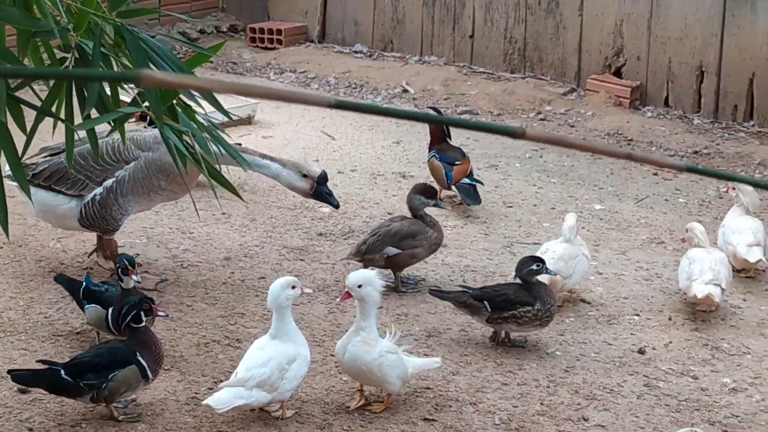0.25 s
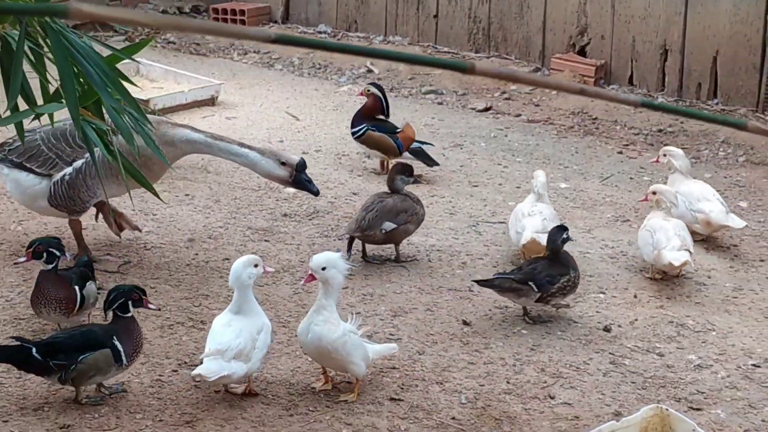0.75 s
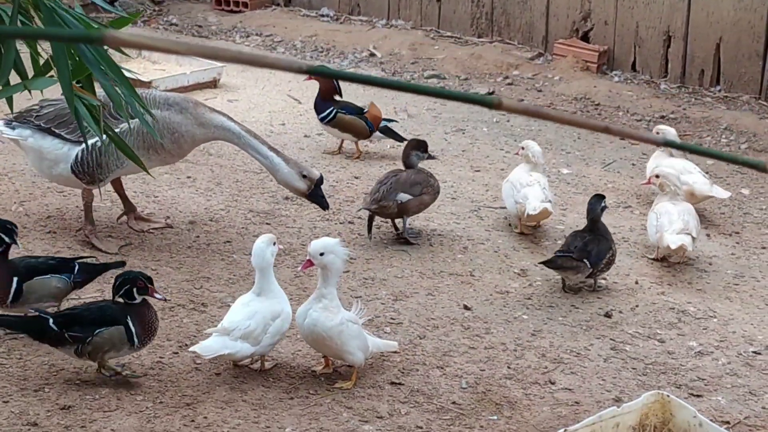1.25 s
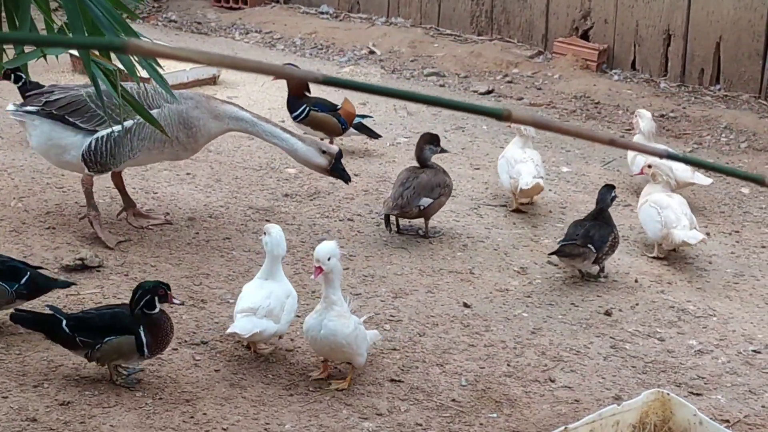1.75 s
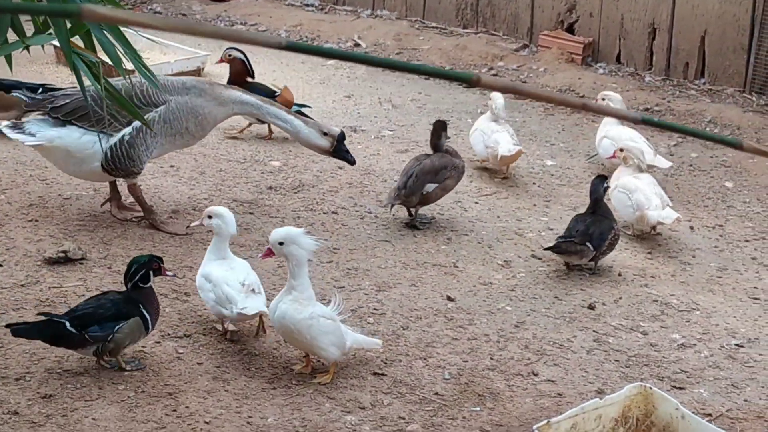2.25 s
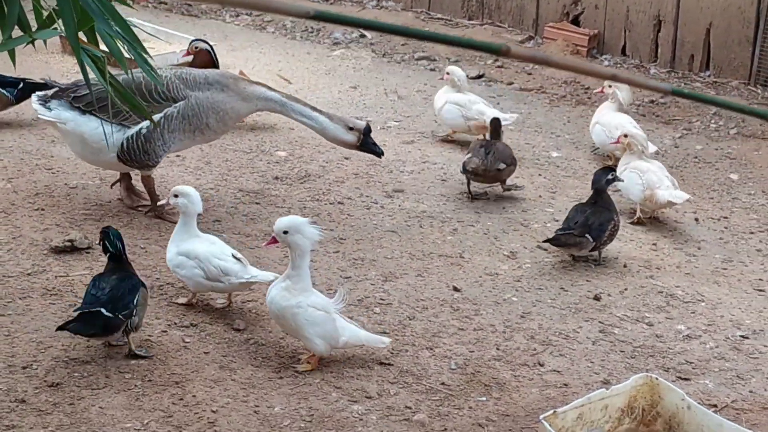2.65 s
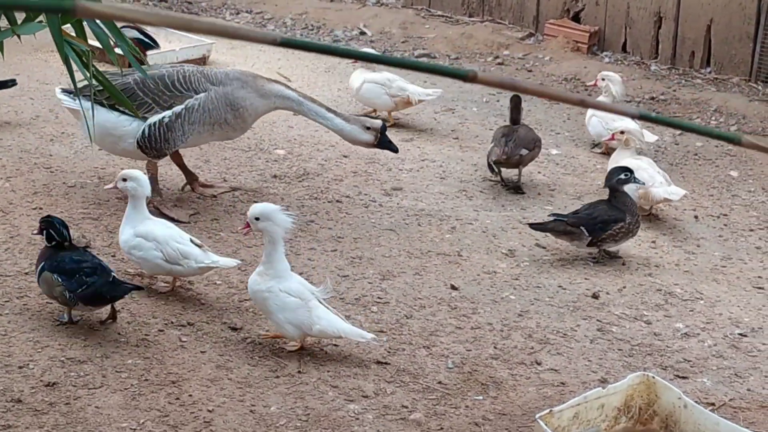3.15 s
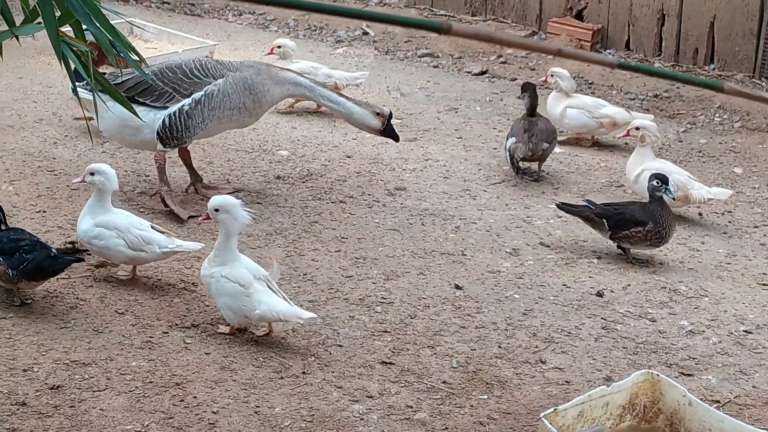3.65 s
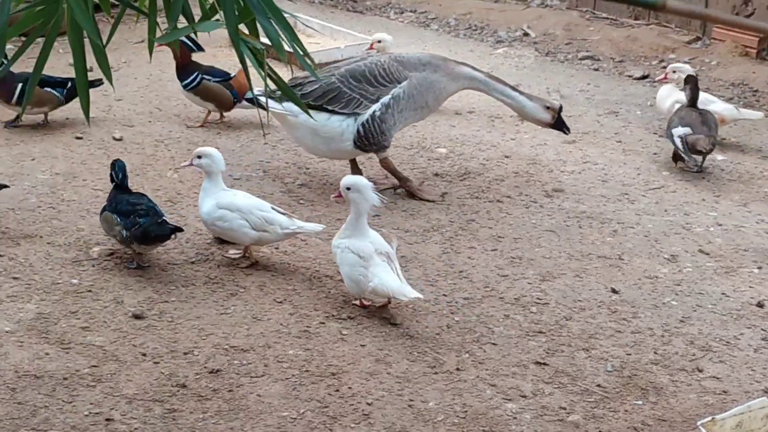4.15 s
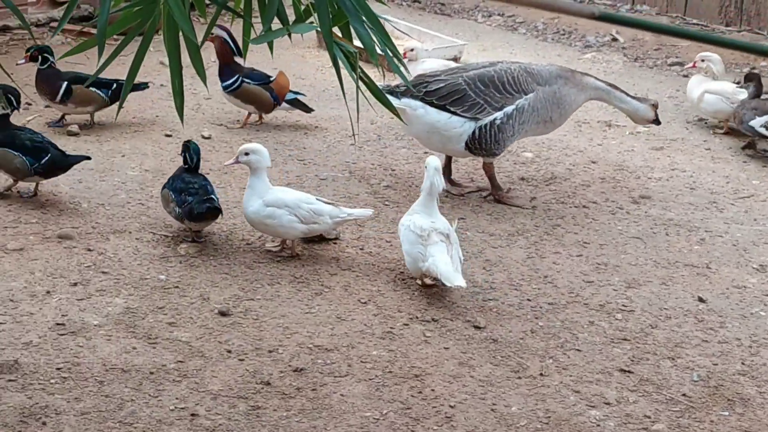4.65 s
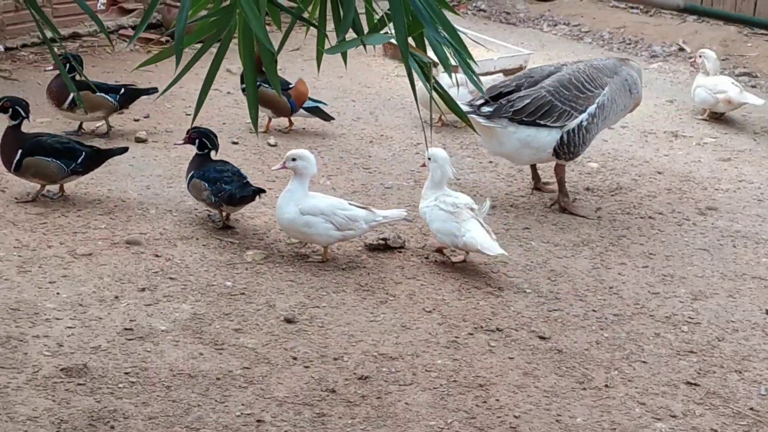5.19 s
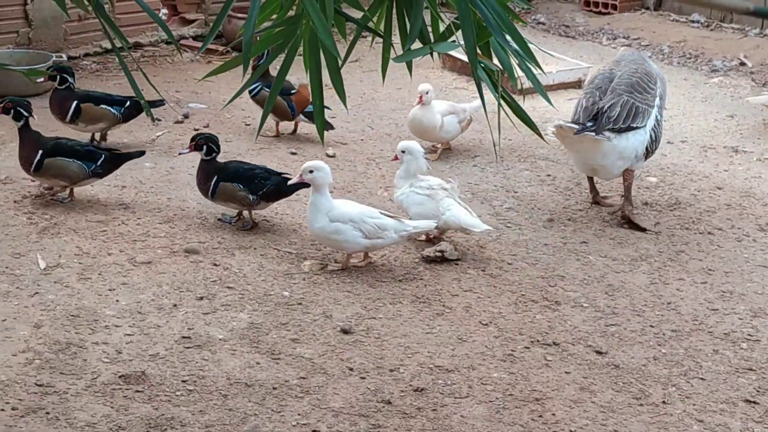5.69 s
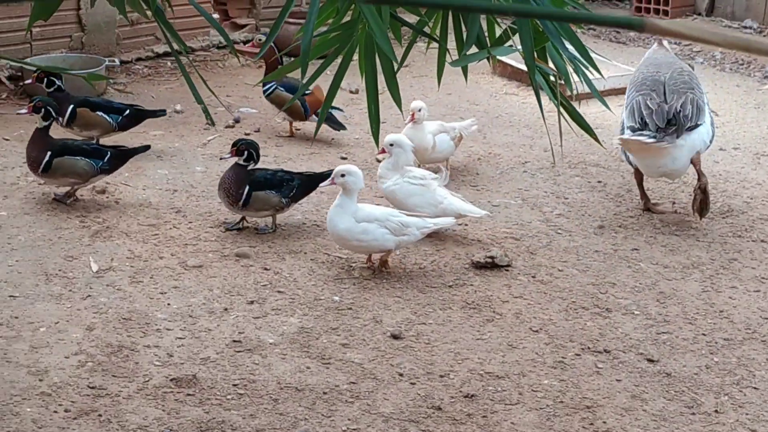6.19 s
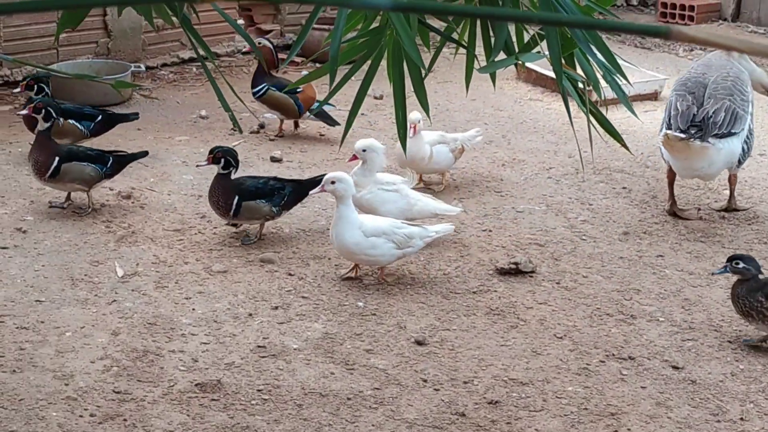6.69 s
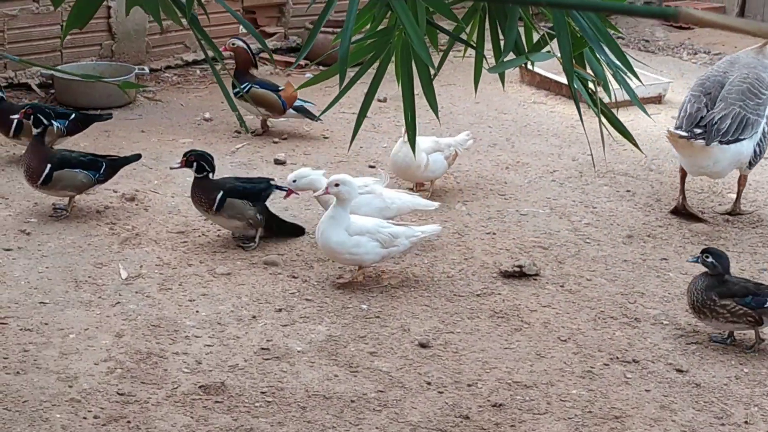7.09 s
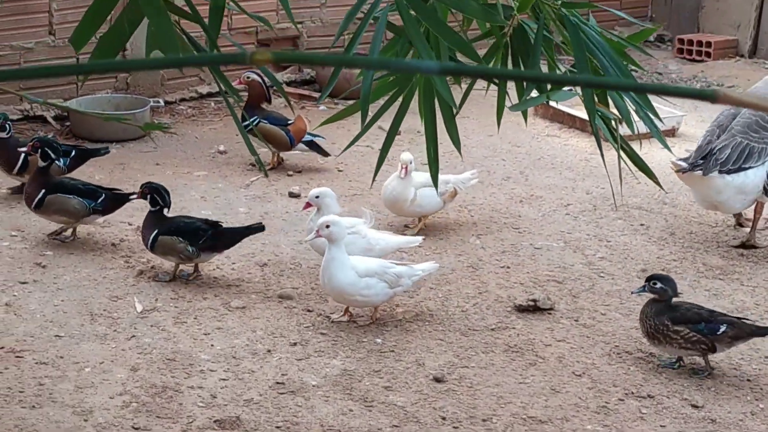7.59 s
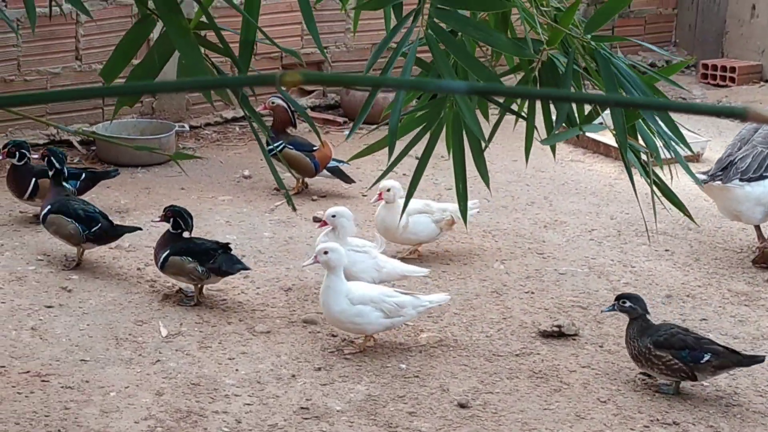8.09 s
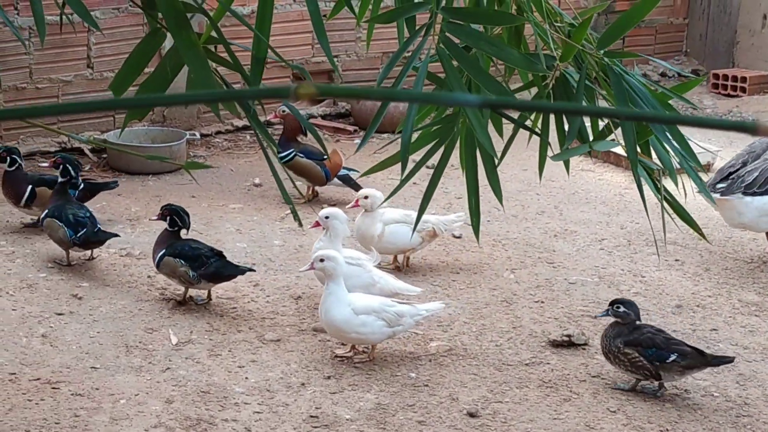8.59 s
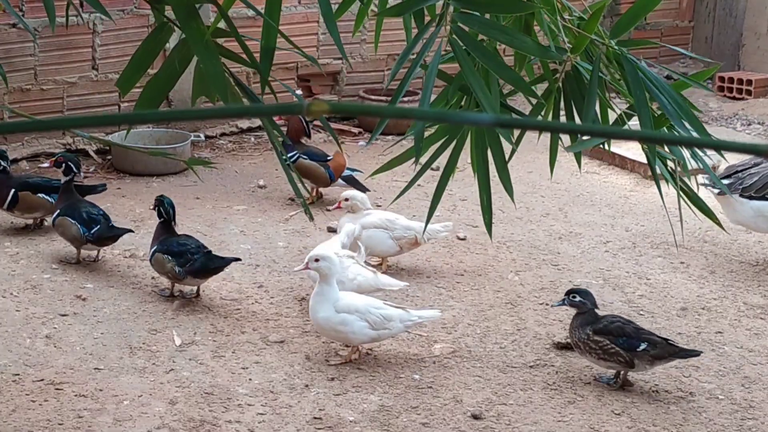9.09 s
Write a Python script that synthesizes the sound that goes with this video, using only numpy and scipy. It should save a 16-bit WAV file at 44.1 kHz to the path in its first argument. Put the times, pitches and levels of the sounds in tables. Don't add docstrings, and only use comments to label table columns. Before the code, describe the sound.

A goose gives loud, hoarse, brassy honks about every second and a half, while ducks faintly whistle, squeak and purr in a walled dirt yard.

```python
import sys
import numpy as np
from scipy import signal
from scipy.fft import rfft, irfft, next_fast_len
from scipy.io import wavfile
from scipy.ndimage import uniform_filter1d, minimum_filter1d, map_coordinates

SR = 44100
rng = np.random.default_rng(int(sys.argv[2]) if len(sys.argv) > 2 else 0)


def undo_db(level):
    steps = np.asarray(level, float) / 20
    return 10 ** steps


def materialize(psi):
    bounded = np.clip(np.atleast_2d(psi).T, -1, 1)
    quanta = np.round(bounded * 32767).astype(np.int16)
    wavfile.write(sys.argv[1], SR, quanta)


N = 411894

# Hz, width in Hz, level in dB.
CHEST_MODES = [(165, 60, 17), (346, 60, -16), (566, 190, 13)]
WINDPIPE_MODES = [(483, 7.7, -16), (881, 84, 14.5), (1126, 44, 13)]
MOUTH_MODES = [(1279.6, 46.6, 8), (1680, 71, 4.5)]
BEAK_MODES = [(1947, 250, 0), (2218, 180, 6), (2407, 102, 5.5), (2679, 90, 3), (2915, 130, 0.5)]
# Hz, level in dB per Hz.
RASP_SPECTRUM = [(1760, -24.5), (3000, -12), (3170, -6), (3840, -5), (4890, -10), (9130, -13),
                 (11600, -32.5), (13500, -33), (14100, -63.5), (15500, -103)]
# time in seconds, lag of the left port in ms, left over right in dB.
BEARING = [(.5, 0.55, 11), (2, 0.56, 9), (3.5, 0.69, 7), (5.2, 0.53, 8), (6.8, 0.36, 6), (8.8, 0.16, 7)]


def goose():
    low_pitch, pitch, rough, lift_db, drop_db = melody()
    drone, _ = syrinx(low_pitch, rough, waver=.008, jitter=.04, scatter_db=4, breath=.5)
    source, puffs = syrinx(pitch, rough, waver=.011, jitter=.045, scatter_db=5, breath=.6)
    ring_alike, ring_lagging, locked = rings()

    harsh = source + 0.75 * unit(puffs * rng.standard_normal(N))
    hiss = unit((puffs + .15) * rng.standard_normal((2, N)))
    rasp = unit(filtered(hiss, lambda hz: undo_db(along(RASP_SPECTRUM, hz)) * (hz > 2950)))
    steep = filtered(source + 0.57 * (harsh - source), lambda hz: 1 / (1 + (330 / (hz + 1)) ** 6))

    rest = 1 - 0.29 * locked
    horn = resonate(resonate(steep, [(987, 750, 0)]), WINDPIPE_MODES) * rest
    mouth = resonate(resonate(steep, [(1450, 2700, 0)]), MOUTH_MODES) * rest
    beak = resonate(resonate(harsh, [(2360, 3800, 0)]), BEAK_MODES) * rest
    hum = resonate(resonate(drone, [(268, 300, 0)]), CHEST_MODES)

    horn_gain, chest_gain, mouth_gain, beak_gain = breath_levels(pitch, lift_db, drop_db)
    low = horn_gain * horn
    high = undo_db(-4) * mouth_gain * mouth + undo_db(-2) * beak_gain * beak
    rasp = undo_db(-15) * beak_gain ** 0.86 * rasp
    chest = undo_db(4.85) * chest_gain * hum

    low, high, *rasp = patchy(np.array([low, high, *rasp]), 3.2, bins=4, frames=5)
    low = low + ring_alike
    high = high + ring_lagging

    lag_ms, pan_db, _ = curves(BEARING)

    def delayed(x, share):
        return map_coordinates(x, [np.arange(N) - share * lag_ms * SR / 1000], order=3)

    left = delayed(high, 1) + delayed(low, .1)
    left = (left + rasp[0]) * undo_db(pan_db / 2)
    right = (high + low + rasp[1]) * undo_db(-pan_db / 2)
    return np.array([left, right]), chest, high + low / 4 + rasp[0]


def syrinx(pitch, rough, waver, jitter, scatter_db, breath):
    rough = uniform_filter1d(np.clip(rough, 0, 1), size=400)
    shake = 1 + waver * wobble(22) + jitter * rough * wobble(120)
    turns = np.cumsum(uniform_filter1d(pitch, size=450) * shake) / SR
    at = np.flatnonzero(np.diff(np.floor(turns)))
    late = (np.ceil(turns[at]) - turns[at]) / (turns[at + 1] - turns[at])
    size = undo_db(scatter_db * rough[at] * rng.standard_normal(N)[at])
    pulses = np.bincount(at, size * (1 - late), N) + np.bincount(at + 1, size * late, N)
    puffs = np.exp(-3.5 * (turns % 1))
    leak = np.clip(breath * rough, 0, 1)
    air_noise = unit(puffs * rng.standard_normal(N))
    return np.sqrt(1 - leak ** 2) * unit(pulses) + leak * air_noise, puffs


# start in seconds, end of the breath in seconds,
# then windpipe, chest and beak level in dB (the beak's between swells).
HONKS = [
    (0.235, 0.857, -33, -42.5, -41),
    (1.544, 2.275, -25, -43, -40.5),
    (3.097, 3.86, -27, -41.5, -39),
    (4.794, 5.55, -26, -40, -39.5),
    (6.263, 7.32, -32, -40, -42.5),
    (8.344, 8.93, -27, -45.5, -38),
    (9.019, 9.251, -28, -43, -37),
]
# time in seconds, pitch in Hz.
LOW_NOTES = [
    [(.3, 162.9), (.5, 167.4), (.75, 175.6)],
    [(1.6, 161.7), (1.7, 165), (1.8, 160.8), (2.03, 177.1), (2.13, 180.3)],
    [(3.21, 166.4), (3.3, 156.7), (3.5, 168.4), (3.65, 165)],
    [(4.85, 157.3), (5.02, 155.4), (5.09, 169.4), (5.26, 173.4), (5.47, 179.8)],
    [(6.32, 157.4), (6.41, 182.6), (6.49, 156.2), (6.58, 185.4), (6.79, 176.6), (6.86, 169), (6.92, 180),
     (7.26, 175.5)],
    [(8.48, 149.8), (8.56, 143.9), (8.64, 150.7), (8.84, 167.9)],
    [(9.16, 174.7)],
]
# start in seconds, length in seconds, pitch in Hz,
# windpipe dB over the honk, chest dB over the low note.
JUMPS = [(.35, 0.058, 183.8, 0.5, -7.5), (0.515, 0.2, 273, -2.5, -28.5), (1.824, .205, 220.6, 2, -9.5),
         (2.139, 0.058, 220.6, 0, -21), (2.201, 0.15, 272.2, 1.5, -6.5), (3.389, 0.12, 220.2, 3.5, -15),
         (3.673, 0.16, 220.5, 4, -15.5), (4.897, .065, 259, 1, 0), (5.101, 0.079, 218.3, 4, -16.5),
         (5.177, 0.06, 266, -1.5, -20.5), (5.365, 0.097, 220.3, 1.5, -18), (6.592, .06, 222.7, 3, -25),
         (6.654, 0.059, 283.2, 5.5, -30.5), (6.714, .064, 223.7, 6.5, -15.5),
         (6.929, .229, 191.4, -4, -23.5), (7.154, 0.096, 283.4, 8, -9.5), (8.644, 0.09, 201.7, -2, -10),
         (8.731, 0.099, 253, 1.5, -22), (8.889, 0.098, 204.5, -1.5, -20), (8.998, .16, 260.9, -1, -21.5)]


def melody():
    scoop, scoop_s, sag, sag_s = .11, .03, .12, .06
    reach, reach_s, chest_lag_s = .03, .025, 0.013
    rough_low, rough_high, rough_edge = .34, .15, .3
    t = np.arange(N) / SR
    pitch = np.interp(t, *np.transpose(sum(LOW_NOTES, [])))
    rough = np.full(N, rough_low)
    for start, end, *_ in HONKS:
        head = (t > start - .05) * (t < end) * np.exp(-np.abs(t - start) / scoop_s)
        tail = ramp(t, end - sag_s, 2 * sag_s) * (t < end + .08 + sag_s)
        pitch = pitch * (1 - scoop * head - sag * tail)
        rough = rough + rough_edge * (head + tail)
    low = pitch.copy()
    lift_db, drop_db = np.zeros((2, N))
    for start, length, hz, horn_db, chest_db in JUMPS:
        on = slice(round(start * SR), round((start + length) * SR))
        pitch[on] = hz * (1 - reach * np.exp((start - t[on]) / reach_s))
        rough[on], lift_db[on], drop_db[on] = rough_high, horn_db, chest_db
    drop_db = np.interp(t - chest_lag_s, t, uniform_filter1d(drop_db, size=2400)) + 2.5 * wobble(12)
    return low, pitch, rough, uniform_filter1d(lift_db, size=1500), drop_db


# peak in seconds, beak dB, mouth dB, length in seconds.
SWELLS = [(0.388, -25, -14.5, 0.21), (0.641, -12.5, -8, 0.15), (.78, -33.5, -32, 0.35),
          (1.69, -25.5, -24.5, 0.12), (1.956, -19.5, -24, 0.2), (2.221, -22, -24.5, 0.31),
          (3.23, -28.5, -34, 0.095), (3.51, -19.5, -22.5, 0.19), (3.783, -22.5, -33.5, 0.19),
          (4.945, -30, -40, 0.15), (5.192, -22, -26, 0.18), (5.449, -21.5, -18, 0.16),
          (6.408, -30, -26.5, 0.18), (6.686, -20, -27.5, 0.23), (6.817, -32.5, -44.5, 0.082),
          (7.003, -31, -41, 0.24), (7.172, -19.5, -21, 0.24), (8.458, -44.5, -35.5, 0.067),
          (8.771, -21, -15, 0.08), (8.945, -35, -30, 0.14), (9.067, -28, -29.5, 0.55)]


def breath_levels(pitch, lift_db, drop_db):
    attack_s, release_db_per_s = 0.012, 314
    beak_early_s, chest_late_s, chest_lingers_s = 0.03, 0.035, 0.019
    rise_share, swell_depth_db = 0.58, 52
    t = np.arange(N) / SR
    mouth, beak = np.zeros((2, N))
    for s, beak_db, mouth_db, length in SWELLS:
        away = np.where(t < s, (s - t) / rise_share, (t - s) / (1 - rise_share)) / length
        shape = undo_db(-swell_depth_db / 2 * np.minimum(away, 6))
        mouth += undo_db(mouth_db) * shape
        beak += undo_db(beak_db) * shape

    def blow(start, end, attack):
        return ramp(t, start, attack) ** 2 * undo_db(-release_db_per_s * np.clip(t - end, 0, .5))

    octaves = np.log2(uniform_filter1d(pitch, size=1800) / 160)
    out = np.zeros((4, N))
    for start, end, horn_db, chest_db, base_db in HONKS:
        upper = blow(start, end - beak_early_s, attack_s)
        base = undo_db(base_db + 9 * octaves)
        out[0] += undo_db(horn_db + lift_db) * blow(start, end, attack_s)
        out[1] += undo_db(chest_db + drop_db) * blow(start, end + chest_lingers_s, chest_late_s)
        out[2] += upper * (mouth + undo_db(3.5) * base)
        out[3] += upper * (beak + base)
    return out


# start in seconds,
# length in seconds, Hz, level in dB, level of its octave in dB over it.
RINGS = [(0.351, 0.057, 1092, -18.5, -9.5), (0.533, 0.033, 1620, -25.5, -5), (0.549, .14, 1326, -23.5, 5.5),
         (0.591, 0.031, 1647, -22.5, -18.5), (.69, 0.04, 1055, -26, 6), (1.669, 0.063, 1327, -28.5, 0.5),
         (1.845, .16, 1331, -30, 3.5), (1.943, 0.1715, 897, -26, -0.5), (2.119, .12, 1115, -22, -11),
         (3.385, 0.14, 1096, -20.5, -16.5), (3.479, 0.038, 1300, -31.5, 8), (3.675, 0.11, 1110, -23, -13),
         (5.084, .13, 1079, -22, -18), (5.147, .065, 1170, -40, 22), (5.364, 0.16, 1086, -23, -0.5),
         (6.653, .055, 1670, -16.5, -28), (6.689, 0.066, 902, -22, -10), (6.935, 0.16, 1129, -29, -1),
         (7.14, 0.041, 1411, -23.5, 9), (7.15, 0.061, 1157, -32, 11), (8.723, 0.096, 1272, -27.5, 3),
         (9.011, 0.057, 1583, -23.5, -6), (9.043, 0.077, 1298, -17, -6.5),
         (9.15, 0.072, 870.3, -22.5, -12.5)]


def rings():
    lock_s, let_go_s = 0.0072, 0.02
    alike, lagging, locked = np.zeros((3, N))
    drift = np.cumsum(1 + .005 * wobble(90) + .004 * wobble(15)) / SR
    flutter = undo_db(1.8 * wobble(40))
    for start, length, hz, db, octave_db in RINGS:
        on = slice(round(start * SR), round((start + length + let_go_s) * SR))
        t = np.arange(N)[on] / SR
        turn = 2 * np.pi * hz * drift[on]
        held = ramp(t, start, lock_s) * (1 - ramp(t, start + length - let_go_s, 2 * let_go_s))
        target = alike if hz < 1200 else lagging
        target[on] += undo_db(db + 3) * held * flutter[on] * np.sin(turn)
        bulge = np.sin(np.pi * ramp(t, start, length + let_go_s) ** 1.3) ** 2
        alike[on] += undo_db(db + octave_db + 3) * bulge * flutter[on] * np.sin(2 * turn)
        locked[on] = np.maximum(locked[on], held)
    return alike, lagging, locked


def resonate(x, modes):
    def response(f):
        total = 0
        for k, (center, width, db) in enumerate(modes):
            total = total + (-1) ** k * undo_db(db) * 1j * f * width / (center * center - f * f + 1j * f * width)
        return total

    y = filtered(x, response)
    return y / np.sqrt(np.abs(uniform_filter1d(y ** 2, size=1600)) + 1e-12)


# start in seconds, length in seconds,
# Hz at the start, Hz at the end, peak level in dB.
HOARSE_WHISTLES = [
    (7.44, 0.29, 1880, 1650, -66.5),
    (7.68, 0.11, 1530, 1400, -72.5),
]
CLEAR_WHISTLES = [
    (7.36, 0.18, 2250, 2200, -61.5),
    (2.64, .44, 1130, 1030, -75.5),
    (4.08, .12, 4300, 3600, -82),
    (8.12, 0.065, 1336, 960, -72),
    (0.95, 0.17, 860, 756, -69.5),
]
# start in seconds, length in seconds, level in dB.
PURRS = [
    (1.527, .12, -40),
    (2.2, 0.18, -55),
    (3.1, .14, -53),
    (3.301, 0.21, -47),
    (4.018, 0.098, -60.5),
    (6.297, 0.17, -73),
]
# time in seconds, squeak Hz, squeak dB, purr dB.
SQUEAKS = [
    [(0.0, 2680, -50, -65), (0.074, 3730, -45.5, -49), (0.17, 5720, -41, -61)],
    [(2.45, 2866, -63, -86), (2.482, 2730, -44, -52), (2.62, 5220, -53, -57)],
]


def ducks():
    whistle_peak, fade_db = .2, 12
    out = np.zeros(N)
    for whistles, overtone_db in [(HOARSE_WHISTLES, -9), (CLEAR_WHISTLES, -24)]:
        for s, length, hz0, hz1, top_db in whistles:
            hz, db, gate = curves([
                (s, hz0, top_db - fade_db),
                (s + whistle_peak * length, hz0 + whistle_peak * (hz1 - hz0), top_db),
                (s + length, hz1, top_db - fade_db)])
            turn = 2 * np.pi * np.cumsum(hz * (1 + 0.025 * wobble(110))) / SR
            overtones = np.sin(2 * turn) + np.sin(3 * turn) + 0.78 * np.sin(4 * turn)
            tone = np.sin(turn) + undo_db(overtone_db) * overtones
            out += gate * undo_db(db + 18) * (0.5 + 1.28 * wobble(220)) * tone
    purr = unit(filtered(rng.standard_normal(N), lambda hz: np.exp(-((hz - 230) / 75) ** 2)))
    for s, length, db in PURRS:
        out += undo_db(db) * np.sin(np.pi * ramp(np.arange(N) / SR, s, length)) * purr
    for rows in SQUEAKS:
        hz, db, purr_db, gate = curves(rows)
        turn = 2 * np.pi * np.cumsum(hz * (1 + 0.03 * wobble(150))) / SR
        squeak = (wobble(600) + 0.5 * wobble(3000)) * np.sin(turn)
        out += gate * (undo_db(db - 2.0) * squeak + undo_db(purr_db + 3.0) * purr)
    return out


# time in seconds, peak in dB, body over snap in dB, left over right in dB.
SNAPS = [(1.3952, -37.5, -2, -8), (1.4089, -42.5, -21, -4.5), (2.4181, -46.5, -5, 7.5),
         (2.507, -35, -10, -6), (2.534, -38, -15, 11.5), (2.5726, -35.5, -6, -16), (4.424, -41.5, -15, 2.5),
         (4.4889, -50, -9, 6), (8.0395, -54.5, 8.5, -9.5)]


def snaps():
    out = np.zeros((2, N))
    t = np.arange(SR // 50) / SR
    for s, db, body_db, pan_db in SNAPS:
        noise = rng.standard_normal((2, len(t)))
        tick = signal.lfilter([1, 0, -1], [1, -.45, .35], noise)
        body = np.sin(2 * np.pi * 1700 * t) + 0.87 * np.sin(2 * np.pi * 3100 * t)
        click = undo_db(db - 5.0 - 60 * t / 0.014) * (tick + undo_db(body_db + 0.5) * body)
        out[:, round(s * SR):][:, :len(t)] += click * undo_db([[pan_db / 2], [-pan_db / 2]])
    return out


# left delay in ms, left dB, right delay in ms, right dB.
WALLS = [
    (1.3, -5, 2.1, -11.5),
    (4.099, -4.5, 3.2, 1),
    (9.7, -2.5, 11.3, 2),
]
# Hz, seconds to fall by 60 dB.
YARD_DECAY = [(150, 0.31), (1000, 0.31), (3000, 0.39), (10000, 0.033)]


def yard(x, tail_db):
    hz, t, z = signal.stft(rng.standard_normal((2, SR // 2)), SR, nperseg=256)
    decay = undo_db(-60 * t / along(YARD_DECAY, hz)[:, None])
    tail = signal.istft(z * decay, SR, nperseg=256)[1]
    answer = np.pad(undo_db(tail_db) * tail / np.linalg.norm(tail[0]), ((0, 0), (600, 0)))
    for left_ms, left_db, right_ms, right_db in WALLS:
        answer[0, round(left_ms * SR / 1000)] += undo_db(left_db)
        answer[1, round(right_ms * SR / 1000)] += undo_db(right_db)
    return signal.fftconvolve(x[None], answer, axes=1)[:, :N]


# Hz, level in dB per Hz.
AIR_SPECTRUM = [(12, -29.5), (20, 3.5), (38, -13.5), (70, -11), (126, -22.5), (192, -16), (397, -18.5),
                (431, -21), (891, -22), (1050, -21.5), (2960, -20), (3700, -27.5), (6000, -26.5),
                (8800, -17), (10200, -27.5), (13400, -39), (15800, -57)]
# time in seconds, level in dB.
AIR_LEVEL = [(0, -57.5), (1.2, -58), (2.9, -58), (4.1, -57), (4.6, -61), (6, -60.5), (8, -61), (9.34, -59)]
# Hz, likeness from 0 to 1.
LIKENESS = [(60, 0.16), (240, 0.94), (950, 0.0061), (3770, 0.13), (15000, 0)]


def air(patchy_db):
    pair = patchy(rng.standard_normal((2, N)), patchy_db, bins=12, frames=7)

    def spread(hz):
        angle = np.arccos(np.clip(along(LIKENESS, hz), -1, 1)) / 2
        return undo_db(along(AIR_SPECTRUM, hz)) * [np.cos(angle), np.sin(angle)]

    mid, side = filtered(pair, spread)
    return undo_db(curves(AIR_LEVEL)[0] + 7.0) * unit(np.array([mid + side, mid - side]))


def patchy(x, patchy_db, bins, frames):
    z = signal.stft(x, nperseg=1024)[2]
    field = uniform_filter1d(rng.standard_normal(z.shape), size=bins, axis=1)
    field = uniform_filter1d(field, size=frames, axis=2)
    return signal.istft(z * undo_db(patchy_db * unit(field)), nperseg=1024)[1][:, :N]


def filtered(x, response):
    m = next_fast_len(N + SR // 2)
    return irfft(rfft(x, m) * response(np.fft.rfftfreq(m, 1 / SR)), m)[..., :N]


def wobble(rate):
    knots = rng.standard_normal(int(N * rate / SR) + 4)
    return map_coordinates(knots, [np.arange(N) * rate / SR])


def curves(rows):
    s, *cols = np.transpose(rows)
    t = np.arange(N) / SR
    gate = uniform_filter1d(1. * (t > s[0]) * (t < s[-1]), size=200)
    return [np.interp(t, s, c) for c in cols] + [gate]


def along(points, hz):
    f, v = np.transpose(points)
    return np.interp(np.log(hz + 1), np.log(f + 1), v)


def ramp(t, start, length):
    return np.clip((t - start) / length, 0, 1)


def unit(x):
    return x / np.sqrt(np.mean(x ** 2) + 1e-20)


def scene():
    voice, chest, source = goose()
    calls = ducks()
    near = voice + chest + calls * undo_db([[-1.5], [1.5]]) + snaps()
    echo = yard(source + .6 * calls + .15 * chest, tail_db=-8)
    return near + echo + air(patchy_db=1.6)


def band_limit(x):
    return signal.sosfilt(signal.butter(12, 16070, fs=SR, output="sos"), x)


def record(dry):
    need = np.minimum(1, .9 / (np.abs(dry).max(axis=0) + 1e-9))
    held = uniform_filter1d(minimum_filter1d(need, size=1200), size=600)
    mix = filtered(dry * held, lambda hz: hz < 16000)
    return band_limit(mix)


dry = scene()
out = record(dry)
materialize(out)
```